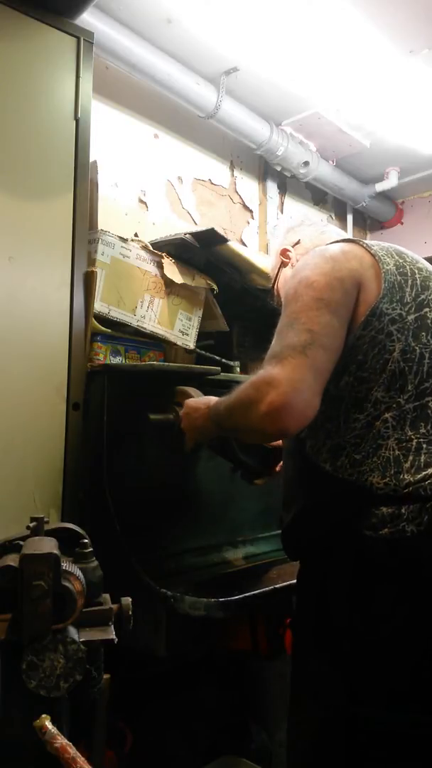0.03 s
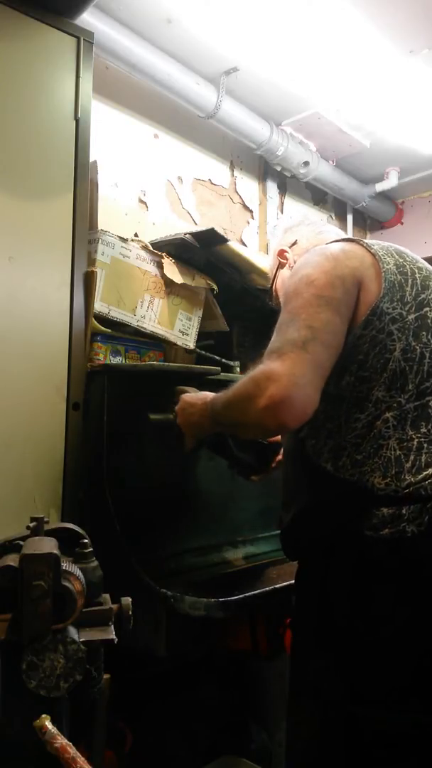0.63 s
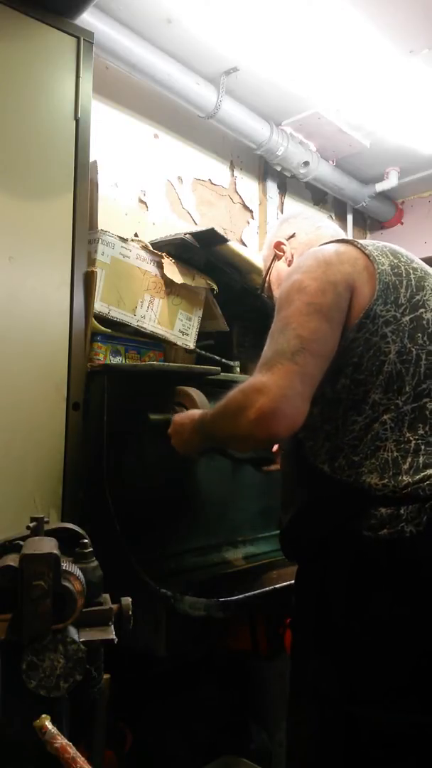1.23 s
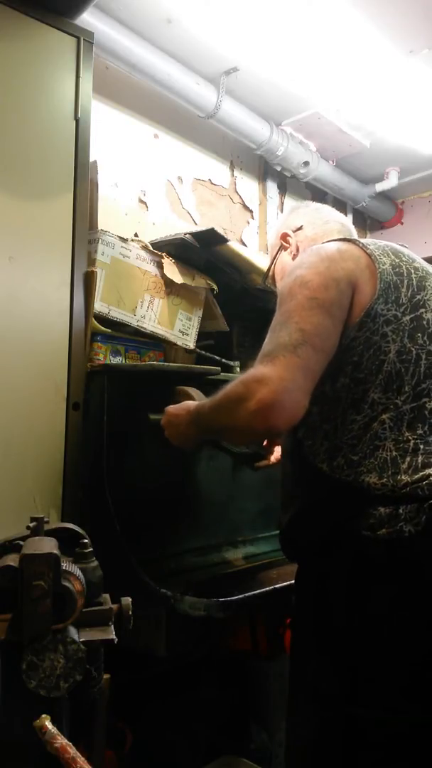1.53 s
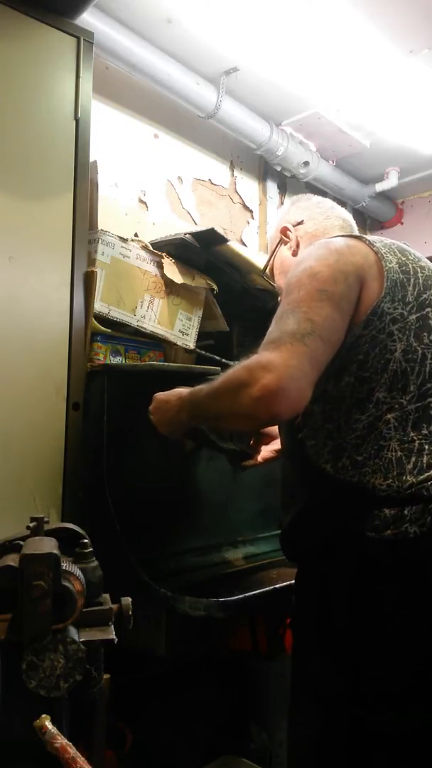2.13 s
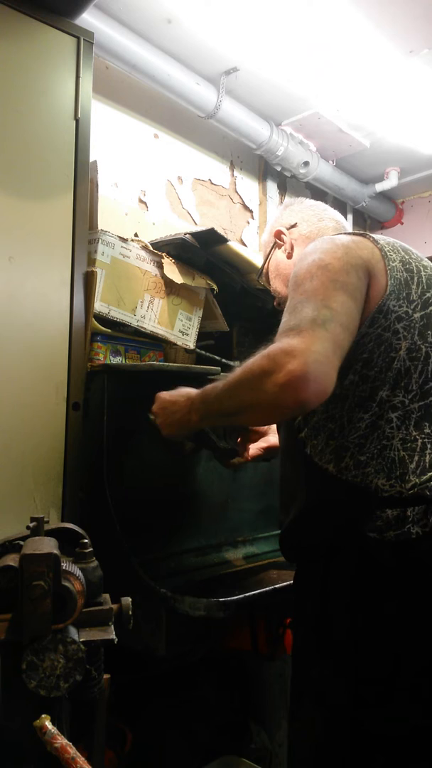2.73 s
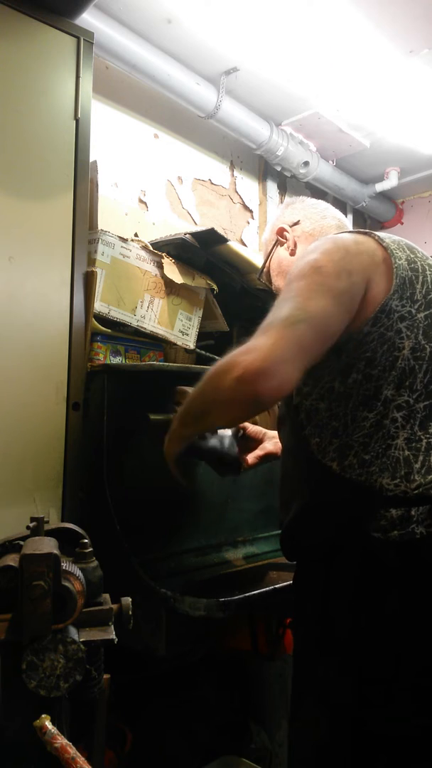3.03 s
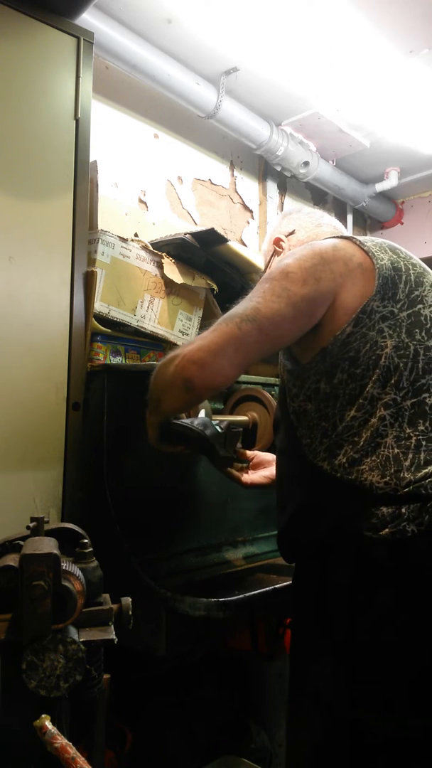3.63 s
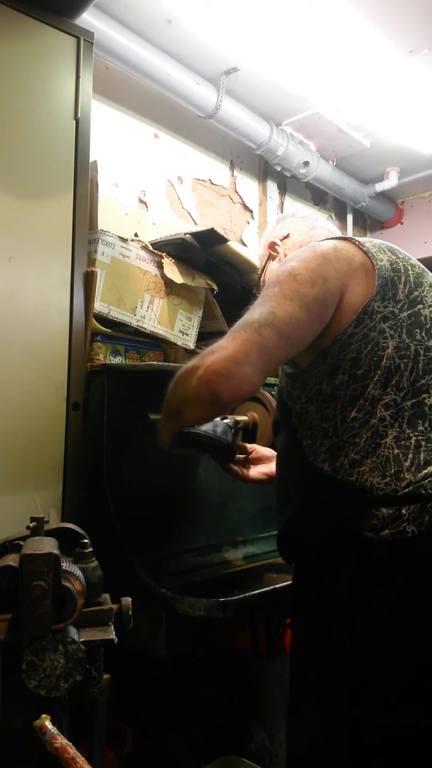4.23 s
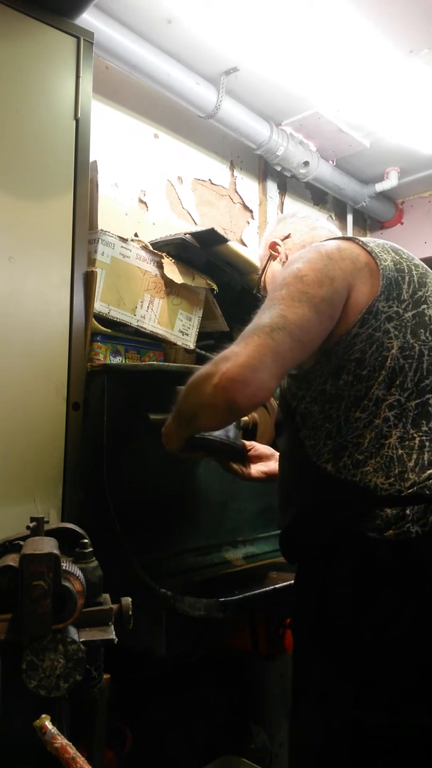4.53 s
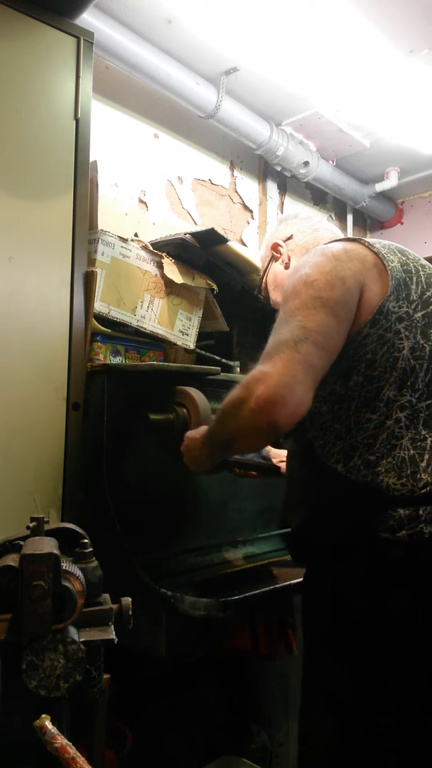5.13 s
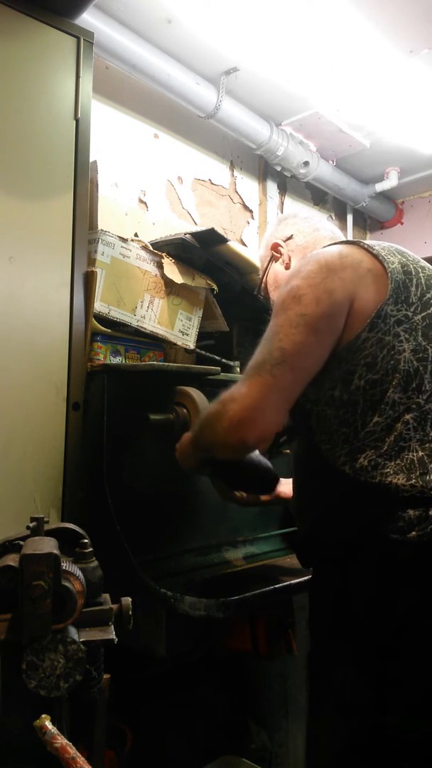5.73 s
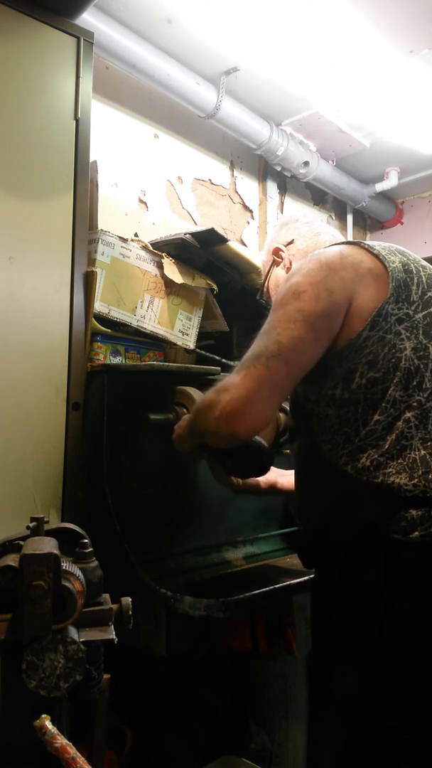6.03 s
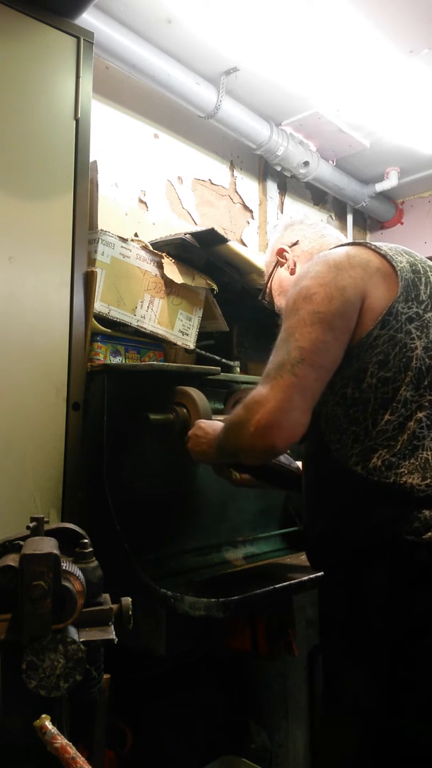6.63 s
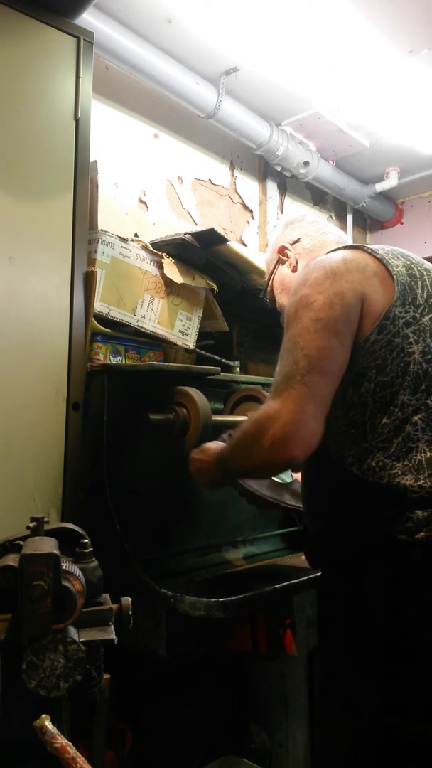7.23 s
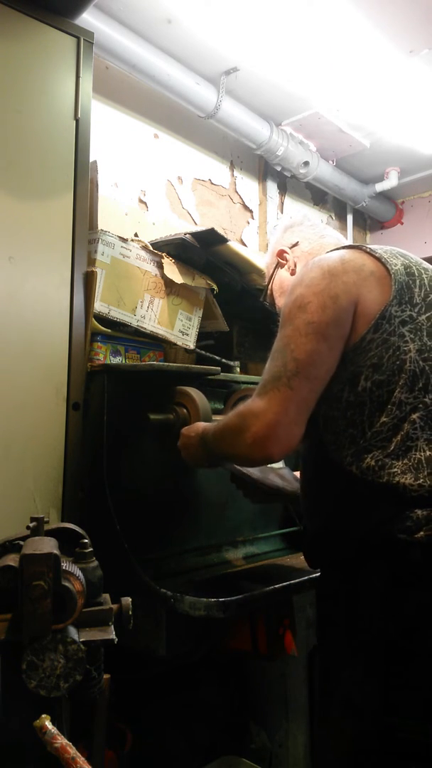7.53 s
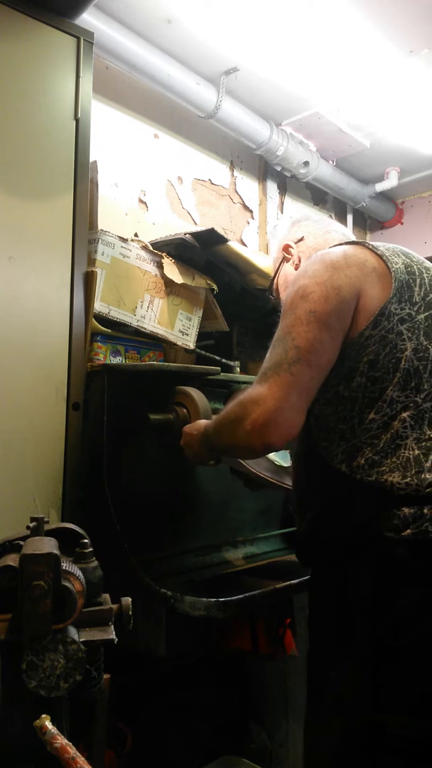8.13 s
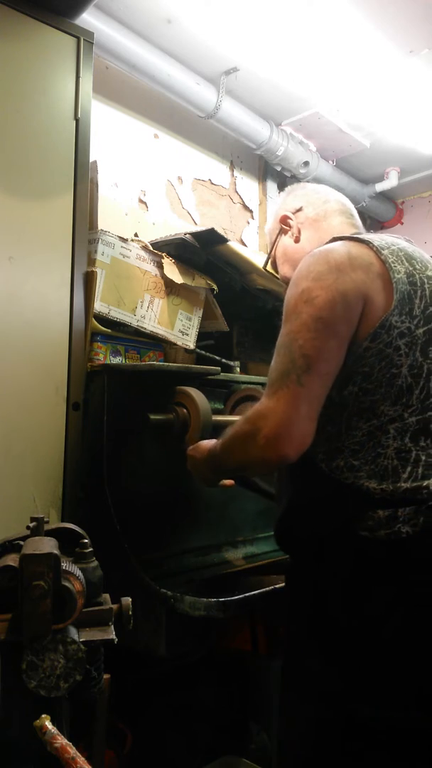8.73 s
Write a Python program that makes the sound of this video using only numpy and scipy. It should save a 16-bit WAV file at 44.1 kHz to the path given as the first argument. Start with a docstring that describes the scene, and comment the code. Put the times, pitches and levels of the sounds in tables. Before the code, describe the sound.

Heard from close by in a small workshop, a leather shoe scrapes against a spinning wheel with a bright, grainy hiss. The rubbing comes in five passes of about one to two seconds, sometimes with a faint high squeal. Underneath, the motor hums and the gears whine and chatter in their iron housing throughout. In the short gaps the wheel swishes softly and the rattle loosens, as it does after the last pass.

```python
"""A geared shoe-finishing machine is running in a small basement workshop, a shoe already on its wheel.
The leather hisses over whining gears, teeth chattering in the iron housing and two humming shafts.
At 0.8 s the shoe lifts: the wheel swishes by itself, the speed recovers and the rattle opens up.
From 1.3 s the shoe comes back again and again, singing briefly where it grips; under each press the
motor sags a little and the gears run tighter. At 8.5 s it lifts for the last time and the machine runs on."""
import sys
import numpy as np
from scipy import signal
from scipy.fft import rfft, irfft
from scipy.io import wavfile

SR = 44100
rng = np.random.default_rng(int(sys.argv[2]) if len(sys.argv) > 2 else 0)


def output_pcm(signal):
    """Save a mono or channel-first signal as 16-bit PCM at the path in sys.argv[1].

    Samples are clipped to [-1, 1] before scaling.
    """
    pcm = np.clip(np.atleast_2d(signal).T, -1, 1) * 32767
    wavfile.write(sys.argv[1], SR, np.round(pcm).astype(np.int16))


N = 391608
TIME = np.arange(N) / SR
BINS = np.fft.rfftfreq(N, 1 / SR)
FREE_HZ = 26.36  # spindle turns per second with no load
SPINDLE_TEETH, COUNTER_TEETH = 10, 14
GEAR_RATIO = SPINDLE_TEETH / COUNTER_TEETH
SIDES = np.array([[.5], [-.5]])  # splits a left-right offset between the channels

# stereo phase: f/Hz, lead of the left channel/rad
LEFT_LEAD = [(100, 0), (520, -.35), (660, -.7), (790, 1), (920, -1), (1030, .8), (1200, .5), (1310, -.7),
             (1600, .4), (2400, .5), (6000, 1.2)]
# the shoe on the wheel: touch t/s, hardest t/s, lift t/s, relative level/dB at each of the three,
# then its colour: low rasp/dB, high rasp/dB, fine fizz/dB
PRESSES = [(-.1, .73, .81, -9, -1.5, -3, -1.5, -.5, 3.7), (1.3, 1.35, 1.52, -8, -6.3, -7.5, -.5, .5, 1),
           (1.5, 2.4, 2.91, -2.5, -2.3, -4.8, 1.3, .3, 5.3),
           (3.56, 4.2, 5.37, -3, -1.2, -4.8, .7, 1.3, 4.7), (5.9, 6.55, 6.95, -6.3, -4, -4, -1, 1, 4.7),
           (7.57, 8.27, 8.5, -7.5, -3, -4.2, 1.3, .5, 5.3)]


def amp(db):
    """Decibels to gain."""
    return 10 ** (np.asarray(db) / 20)


def spectrum(points, hz):
    """Joins (f/Hz, value) points on a log-frequency axis."""
    f, value = np.transpose(points)
    return np.interp(np.log(hz + 1), np.log(f + 1), value)


def automation(points):
    """Joins (t/s, value) points over the whole scene."""
    return np.interp(TIME, *np.transpose(points))


def bump(offset, width):
    """A bell of height 1 and the given width at half height."""
    return .5 ** ((2 * offset / width) ** 2)


def drift(rate_hz):
    """Slow random modulation of unit size, up to about rate_hz."""
    hz = np.fft.rfftfreq(4096, TIME[-1] / 4096)
    slow = irfft(rfft(rng.standard_normal(4096)) / (1 + (hz / rate_hz) ** 4))
    return np.interp(TIME, np.linspace(0, TIME[-1], 4096), slow / slow.std())


def ripple(width_hz):
    """The room's irregular comb of peaks and dips over frequency, of about unit size."""
    return np.interp(BINS / width_hz, np.arange(4096), rng.standard_normal(4096))


def tone(cycles, hz, level_db, waver, side_db=0, scatter_rad=0):
    """One stereo partial; each side wavers on its own, and reflections scatter the phase between them."""
    wavering = np.array([drift(9.1) + 1j * drift(3.1), drift(3.8) + 1j * drift(4.3)])
    partial = amp(level_db) * (1 + waver * wavering) * np.exp(2j * np.pi * cycles)
    lead = spectrum(LEFT_LEAD, hz) + scatter_rad * rng.choice([-1, 1])
    pan = amp(SIDES * side_db) * np.exp(1j * SIDES * lead)
    return 2 * (partial * pan / np.linalg.norm(pan)).real


def noise(envelope, density_db, ripple_db, ripple_hz, side_db=0):
    """Stereo noise under an envelope of normalised power, coloured by its source and the room."""
    # how alike the two sides are: f/Hz, coherence 0-1
    coherence = [(30, .6), (125, .88), (250, .82), (500, .6), (1000, .35), (1350, .35), (1750, .08),
                 (2400, .5), (4000, .3), (8000, .2), (14000, .15)]
    # stereo balance: f/Hz, left over right/dB
    balance = [(60, 0), (250, -.4), (500, .5), (1000, 2), (2000, 3.2), (4000, 3.6), (8000, 4.6), (13000, 7)]
    common, separate = rfft(rng.standard_normal((2, N)) * envelope / np.sqrt(np.mean(envelope ** 2)))
    alike = spectrum(coherence, BINS)
    lead = spectrum(LEFT_LEAD, BINS) + (1 - alike) * ripple(ripple_hz)  # reflections scatter the phase
    right = (alike * common + np.sqrt(1 - alike ** 2) * separate) * np.exp(-1j * lead)
    room = ripple(ripple_hz) + (1 - alike) * np.array([ripple(ripple_hz), ripple(ripple_hz)])
    pan_db = SIDES * (spectrum(balance, BINS) + side_db)
    colour = amp(density_db + ripple_db * room + pan_db)
    return irfft(np.array([common, right]) * colour * np.sqrt(SR / (1 + alike)), N)


def pressure(press, t, landing_s=.039, leaving_s=.088):
    """One press: the leather lands, is leaned on harder, eased off and lifted."""
    touch, hardest, lift, *levels_db = press[:6]
    contact = np.clip((t - touch) / landing_s, 0, 1) * np.clip((lift - t) / leaving_s + .5, 0, 1)
    return contact * amp(np.interp(t, [touch, hardest, lift], levels_db))


def motor_load(inertia_s=.125, full_press_db=-.6):
    """Drag on the motor, 0 to 1: it follows the pressure, delayed by the inertia of the wheels."""
    force = sum(pressure(press, TIME) for press in PRESSES) / amp(full_press_db)
    pole = np.exp(-1 / (inertia_s * SR))
    return np.clip(signal.lfilter([1 - pole], [1, -pole], force, zi=[force[0]])[0], 0, 1)


def cabinet_rumble(load, swell_db=3, damping_db=8):
    """The cabinet shakes unevenly; the shoe steadies the shaft."""
    # low rumble: f/Hz, noise density/dB
    low_end = [(15, -82), (40, -86), (75, -76), (130, -79), (400, -105), (2000, -140)]
    shaking = amp(swell_db * drift(6) - damping_db * load)
    return noise(shaking, spectrum(low_end, BINS), ripple_db=6, ripple_hz=10.1, side_db=1)


def steady_hum():
    """Faint steady hums and tones of the machine that do not follow the shafts."""
    # steady tones: f/Hz, level/dB
    tones = [(45, -57), (97, -53), (157, -50), (304, -46), (752, -42), (761, -39), (799, -42), (964, -43),
             (1043, -39)]
    return sum(tone(hz * TIME + rng.random(), hz, db, waver=.3, scatter_rad=.3) for hz, db in tones)


def shaft_buzz(turns, load):
    """Uneven teeth repeat once a turn, giving each shaft a comb of partials; load shifts their balance."""
    # each shaft: multiple of its speed, relative level/dB, change at full load/dB, left over right/dB
    spindle = [(2, -60, 1, -2), (5, -52, -2, 1), (6, -47, 1, 1), (11, -48, 3, 1), (14, -45, -8, 0),
               (15, -41, -5, -2), (16, -40, -12, 2), (17, -41, -8, -4), (19, -40, 2, 1), (21, -43, 2, -3),
               (28, -36, -7, 4), (29, -44, 9, 3), (31, -39, 1, 5), (33, -47, -1, 7), (35, -30, -4, 3),
               (40, -41, 12, 6), (45, -46, 8, 2), (50, -32, -4, 2), (55, -39, -6, -10), (60, -49, 12, 13),
               (65, -49, 12, 3), (70, -46, 5, -4), (75, -44, -3, 7), (85, -47, 3, 4), (90, -38, -1, 4),
               (95, -37, -7, 7)]
    countershaft = [(11, -48, -1, 4), (17, -41, -4, -2), (27, -39, -3, 3), (29, -38, 0, -1),
                    (31, -49, 3, -3), (34, -32, -5, 1), (36, -40, -6, 0), (41, -30, -6, 6),
                    (43, -29, -2, 7), (45, -38, -6, 10), (48, -33, -6, 8), (53, -42, 5, -2),
                    (55, -27, -5, 5), (57, -31, -4, 14), (62, -34, -11, -5), (64, -29, -5, -3),
                    (69, -42, 6, -2), (71, -33, -8, -5), (83, -41, -6, 9), (85, -42, 4, 4),
                    (90, -39, -3, 7), (92, -42, 0, 0), (97, -45, 2, 0), (113, -44, 0, 4), (118, -42, -2, 2),
                    (120, -41, -1, 3), (121, -41, -1, 4), (128, -37, -1, 7), (132, -43, 2, 4),
                    (134, -48, 12, 8)]
    buzz = np.zeros((2, N))
    for partials, ratio, gain_db, waver in [(spindle, 1, -1, .21), (countershaft, GEAR_RATIO, .3, .14)]:
        for multiple, db, load_db, side_db in partials:
            cycles = multiple * ratio * turns + rng.random()
            hz = multiple * ratio * FREE_HZ
            partial = tone(cycles, hz, gain_db + db, waver, side_db, scatter_rad=.88)
            buzz += partial * (1 - load + load * amp(load_db))
    return buzz


def gear_chatter(turns, load, tooth_depth=.14, pair_depth=.19, wobble=.099):
    """Teeth knock, every second one harder, and ring the housing over the rush of wheel and bearings."""
    # running noise: f/Hz, relative density/dB
    running = [(20, -90), (50, -80), (105, -67), (130, -58.5), (230, -64), (280, -61), (600, -58.5),
               (800, -55.5), (1280, -56), (1420, -61), (3600, -64), (6400, -67), (7400, -73),
               (10000, -79.5), (11500, -92), (14500, -143)]
    # resonances of the iron housing: f/Hz, width/Hz, boost/dB
    modes = [(298, 42, 7), (440.6, 25, 8.5), (506, 26, 9.5), (658, 20, 4), (775, 31, 5.5), (998, 27, 7.5),
             (1314, 45, 5.5), (1790, 110, 4), (1836, 23, 7), (2227, 200, 6), (2392, 84, 14),
             (2488, 29, 14.5), (2573, 40, 11.5), (3030, 115, 6), (3190, 215, 8), (3335, 34, 12),
             (6470, 240, 3)]
    teeth = turns * SPINDLE_TEETH
    knocks = np.exp(tooth_depth * np.cos(2 * np.pi * teeth) + pair_depth * np.cos(np.pi * teeth))
    knocks *= 1 + wobble * np.cos(2 * np.pi * turns * GEAR_RATIO)  # the larger gear is out of round
    boost = sum((amp(db) ** 2 - 1) / (1 + (2 * (BINS - hz) / width) ** 2) ** 2.3
                for hz, width, db in modes)
    running_db = spectrum(running, BINS)
    ringing_db = running_db + 10 * np.log10(np.maximum(boost, 1e-4))
    ringing = noise(knocks, ringing_db, ripple_db=2, ripple_hz=14, side_db=-1)
    rush = noise(knocks ** .06, running_db, ripple_db=2.5, ripple_hz=21.8)
    # loaded teeth stay in contact and rattle less
    return ringing * amp(.5 - 2 * load) + rush * amp(.33 - 1.6 * load)


def gear_whine(turns, load, play_db, play_share=.64):
    """Meshing teeth sing at multiples of their rate; the lower partials follow load and play."""
    # multiple of the tooth rate, level/dB, change at full load/dB, exponent of the load;
    # every second tooth knocks harder, hence the multiple of 2.5
    lower_partials = [(1, -33.3, .7, 1), (2, -23.3, -5.8, .85), (2.5, -36, 11.5, 2.5)]
    # the loudest whine, at three times the tooth rate, swells and fades on its own: t/s, level/dB
    third_partial = [(0, -18.5), (.75, -22.5), (1.3, -18), (1.85, -24.5), (2.6, -27.5), (3.05, -19),
                     (3.5, -26), (4.55, -24), (5.05, -19.5), (5.65, -26.5), (6.1, -22.5), (6.7, -23),
                     (7.15, -21), (8.88, -23.5)]
    levels = [(k, db + load_db * load ** exponent + play_share * play_db)
              for k, db, load_db, exponent in lower_partials]
    levels.append((3, automation(third_partial)))
    teeth, tooth_hz = turns * SPINDLE_TEETH, FREE_HZ * SPINDLE_TEETH
    return sum(tone(k * teeth, k * tooth_hz, db, waver=.1) for k, db in levels)


def leather_hiss(turns, rim_db=.73, grit_db=.5, flutter_db=.62, hand_db=.5, swish_db=-12):
    """Leather scrapes on the wheel's uneven rim, turn by turn; the shoe's angle colours the hiss."""
    # hiss of leather: f/Hz, relative density/dB
    hiss_colour = [(500, -76), (1500, -67), (2800, -57.5), (3500, -60), (4050, -55.5), (4900, -60.5),
                   (5900, -57.5), (6600, -60), (7300, -62.5), (9600, -67), (11000, -74), (12000, -77.5),
                   (13300, -76), (14600, -94)]
    # bands of the low rasp, the high rasp and the fine fizz: f/Hz, width/Hz
    rasp_bands = [(4200, 3100), (5800, 2100), (12800, 5400)]
    # the leather sings briefly where it grips: middle t/s, length/s, f/Hz, width/Hz, boost/dB, grip 0-1
    squeals = [(1.85, .6, 3990, 130, 7, 0), (2.17, .25, 6100, 200, 4, .6), (2.5, .28, 5560, 450, 4.5, .9),
               (4.3, .25, 9000, 200, 5, 0), (4.75, .45, 5460, 150, 6, .3), (6.83, .22, 3850, 200, 4, .7),
               (7.87, .3, 6200, 170, 9, .8), (8.33, .26, 4520, 200, 6.5, 0)]
    rim = sum(np.cos(2 * np.pi * (k * turns + rng.random())) / np.sqrt(k) for k in range(1, 7))
    grain_db = rim_db * rim + grit_db * rng.standard_normal(N)
    sway_db = flutter_db * drift(26) + hand_db * drift(3.3)
    hiss = noise(amp(grain_db + sway_db), spectrum(hiss_colour, BINS), ripple_db=2.5, ripple_hz=26.28)
    hz, t, frames = signal.stft(hiss, SR, nperseg=1024)
    bands = np.transpose([np.exp(-((hz - centre) / width * 1.9) ** 4) for centre, width in rasp_bands])
    scrape = sum(np.outer(amp(bands @ press[6:]), pressure(press, t)) for press in PRESSES)
    grip_db = bands @ (0, 4.5, -8.5)  # gripping leather rasps more and fizzes less
    squeal_db = sum(np.outer(db * bump(hz - centre, width) + grip * grip_db, bump(t - middle, length))
                    for middle, length, centre, width, db, grip in squeals)
    swish = amp(swish_db + bands @ (3, -1.5, -11))  # the wheel by itself sounds duller
    gain = np.maximum(scrape * amp(squeal_db), swish[:, None])
    return signal.istft(frames * gain, SR, nperseg=1024)[1][:, :N]


def scene(sag_hz=.27):
    """One speed drives both shafts; it sags as the shoe is pressed."""
    # the play between the teeth changes: t/s, extra buzz and rattle/dB
    tooth_play = [(0, 1.8), (1.3, 0.9), (1.8, -0.5), (3.1, 0.05), (3.55, 1.2), (4.4, 0.5), (5.35, -0.45),
                  (5.95, 1.2), (7.35, 1.4), (8.88, 0.4)]
    play_db = automation(tooth_play)
    load = motor_load()
    turns = np.cumsum(FREE_HZ - sag_hz * load) / SR
    tones = gear_whine(turns, load, play_db) + steady_hum()
    rattle = shaft_buzz(turns, load) + gear_chatter(turns, load)
    return tones + rattle * amp(play_db) + cabinet_rumble(load) + leather_hiss(turns)


def record(dry, knee=.6, headroom=.3, cutoff_hz=14700):
    """Soft-clips the tallest peaks, then cuts the top of the treble."""
    straight = np.clip(dry, -knee, knee)
    rounded = straight + headroom * np.tanh((dry - straight) / headroom)
    lowpass = signal.firwin(511, cutoff_hz, window=("kaiser", 9), fs=SR)
    return signal.oaconvolve(rounded, lowpass[None], "same")


dry = scene()
out = record(dry)
output_pcm(out)
```